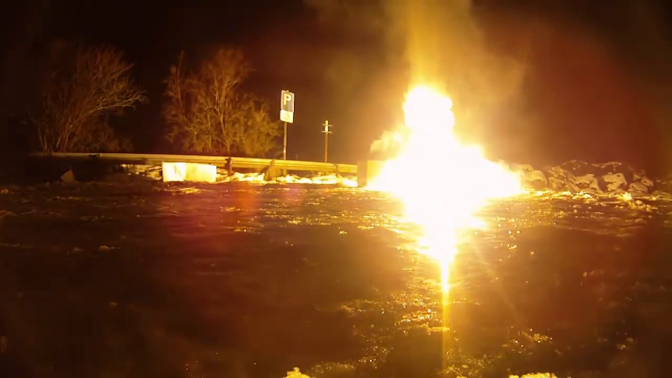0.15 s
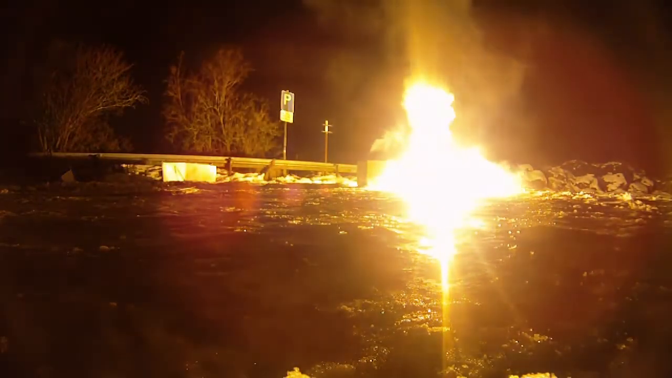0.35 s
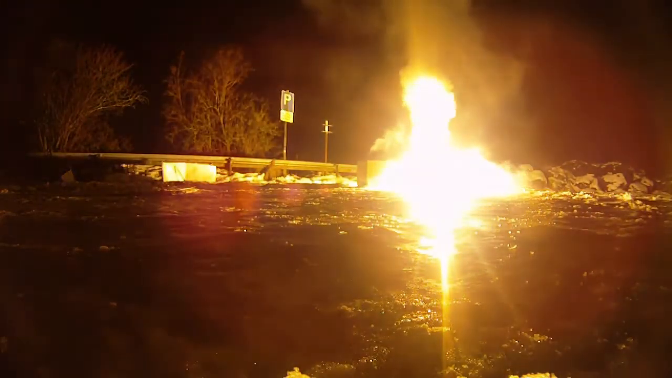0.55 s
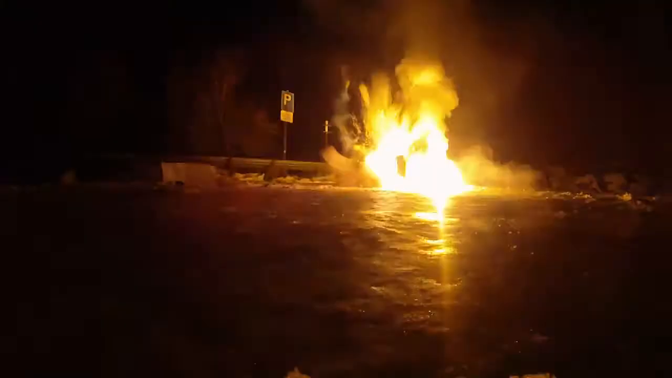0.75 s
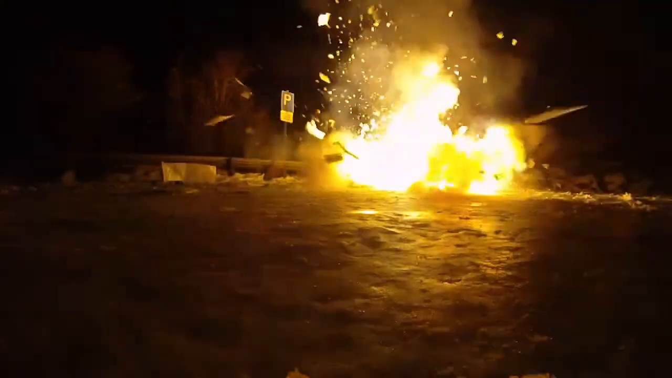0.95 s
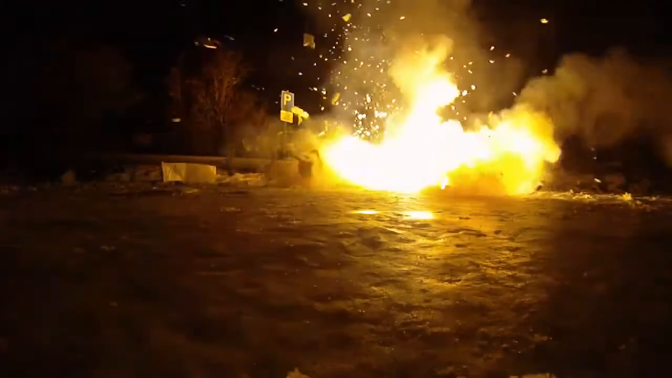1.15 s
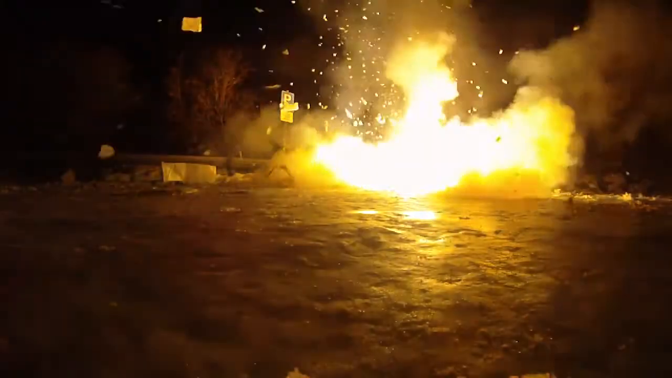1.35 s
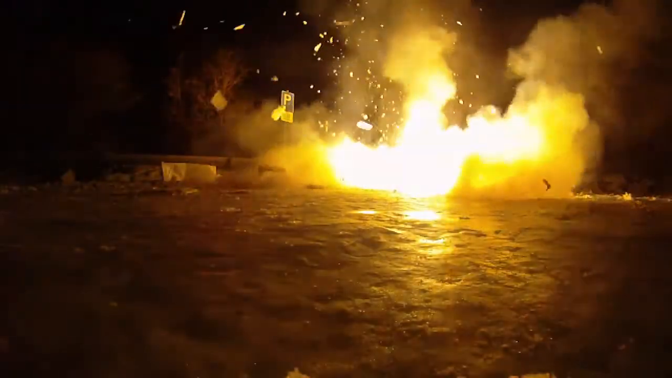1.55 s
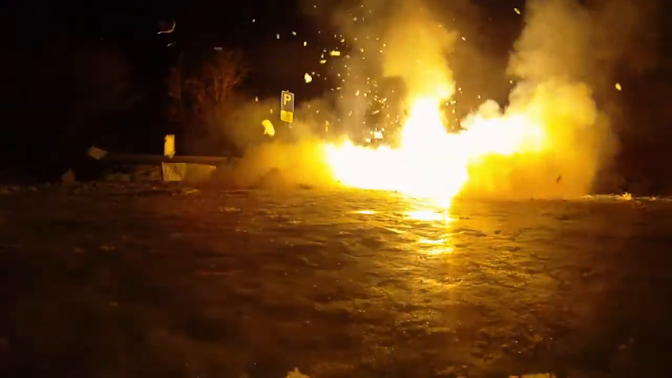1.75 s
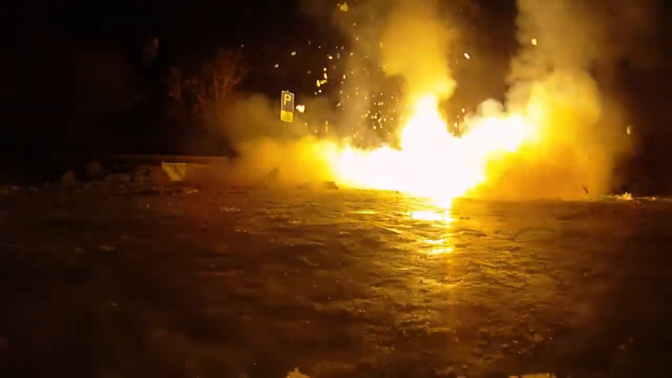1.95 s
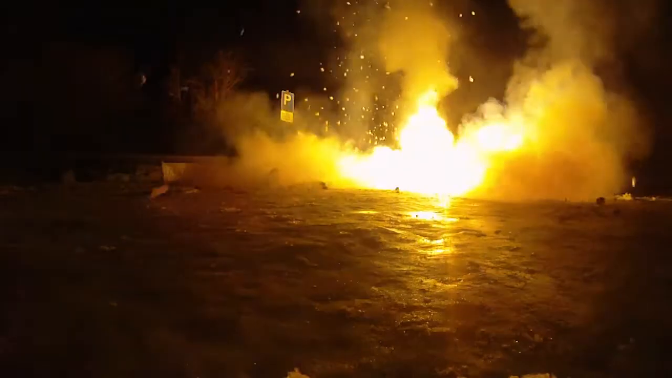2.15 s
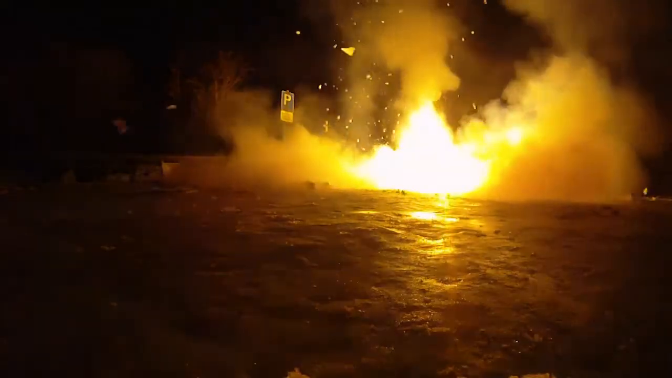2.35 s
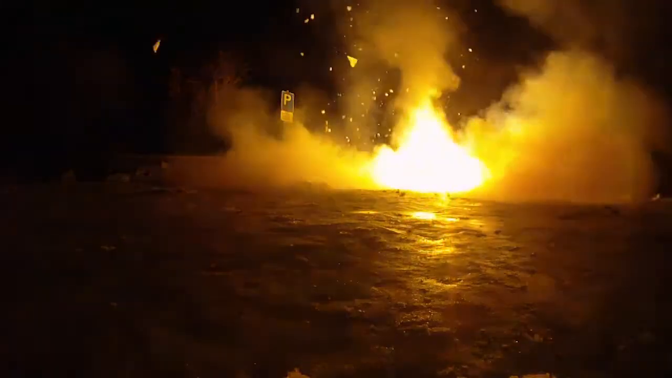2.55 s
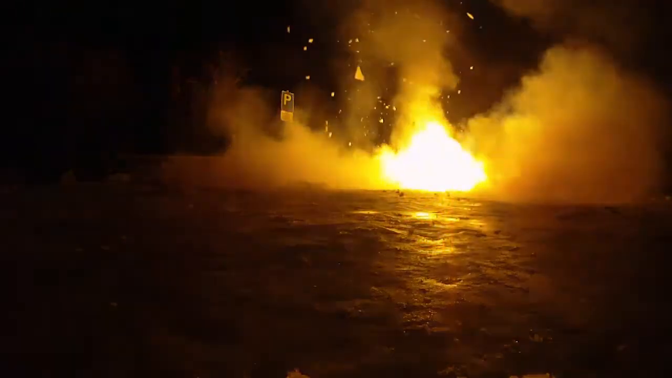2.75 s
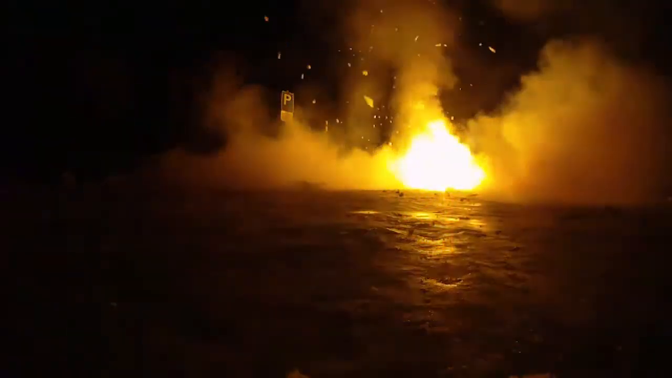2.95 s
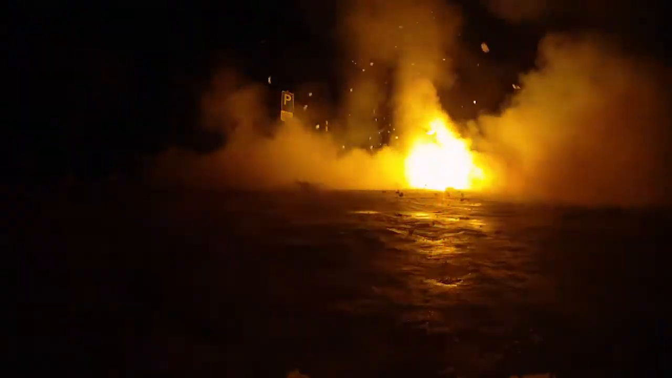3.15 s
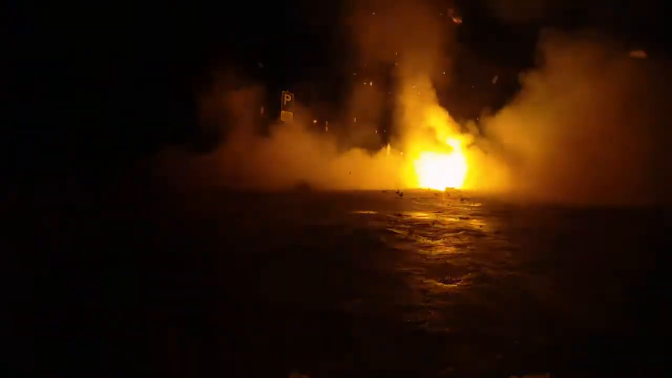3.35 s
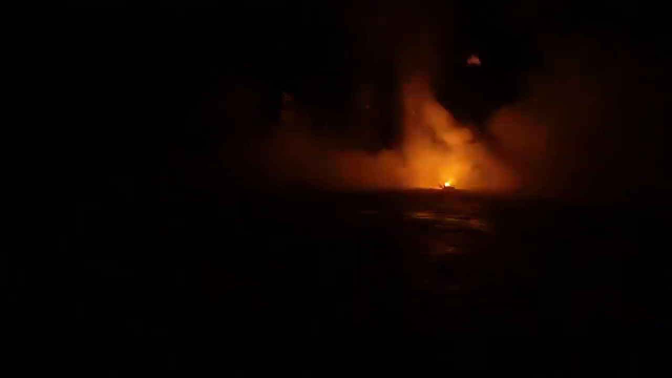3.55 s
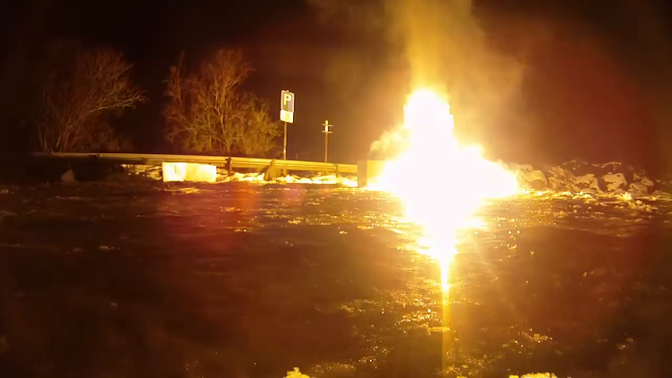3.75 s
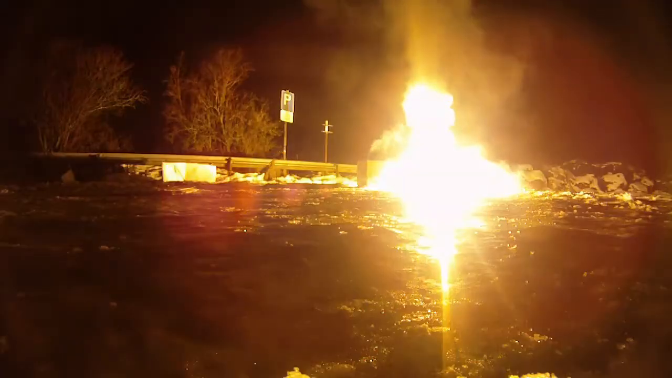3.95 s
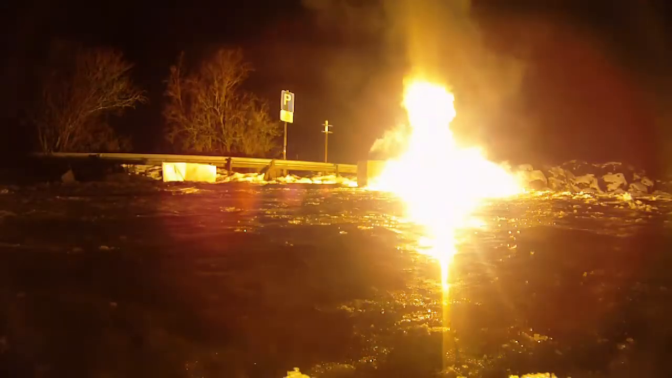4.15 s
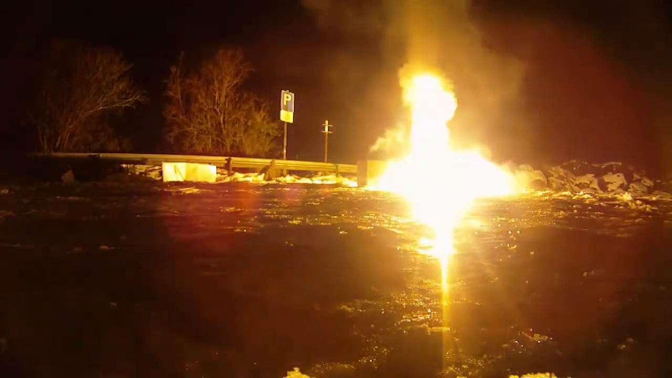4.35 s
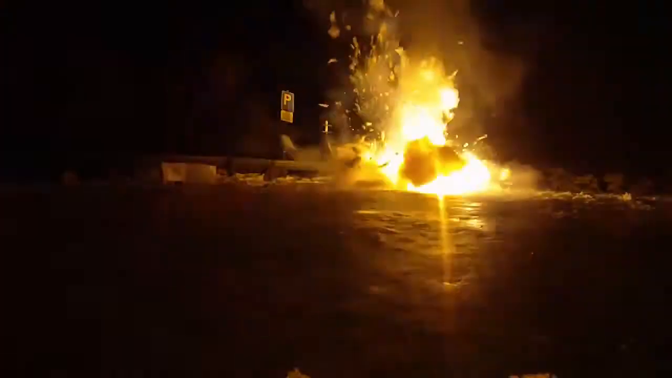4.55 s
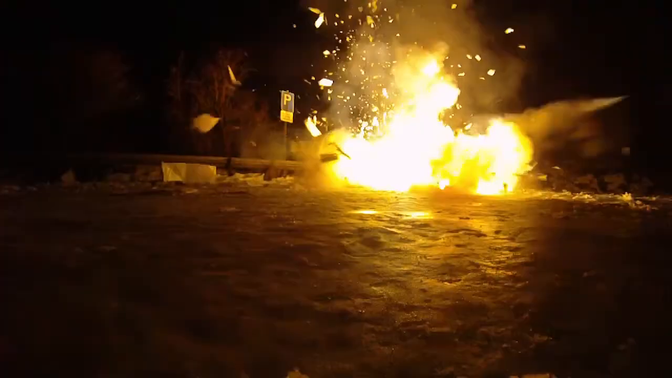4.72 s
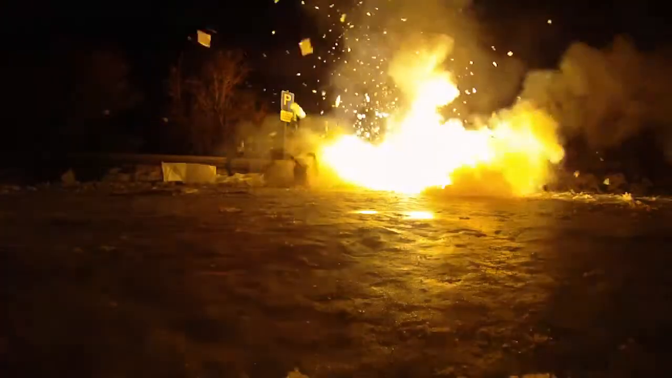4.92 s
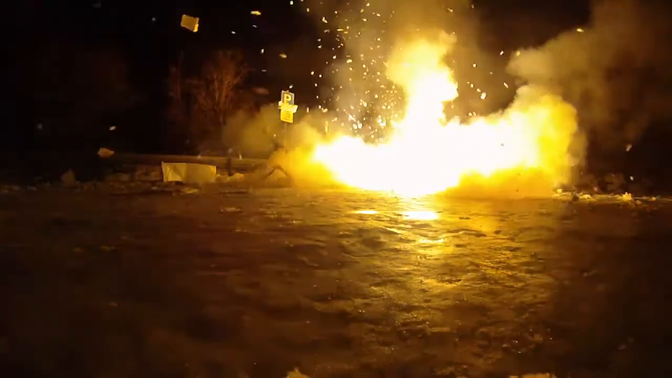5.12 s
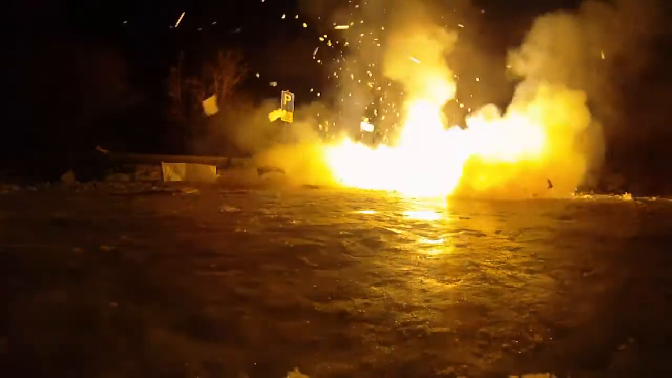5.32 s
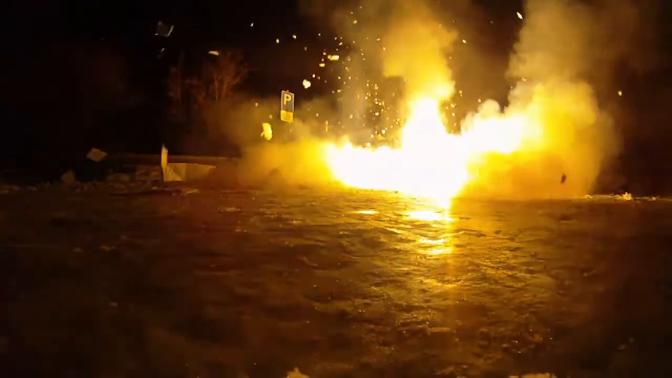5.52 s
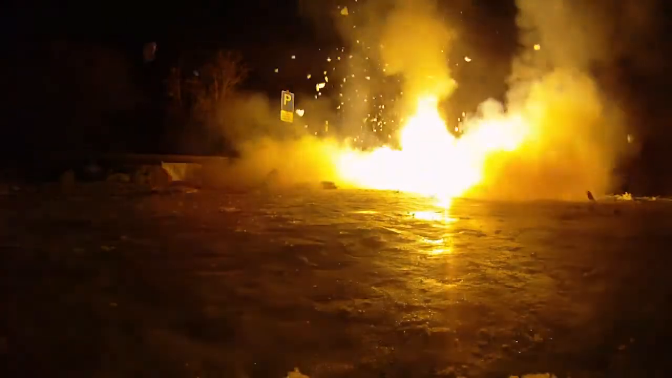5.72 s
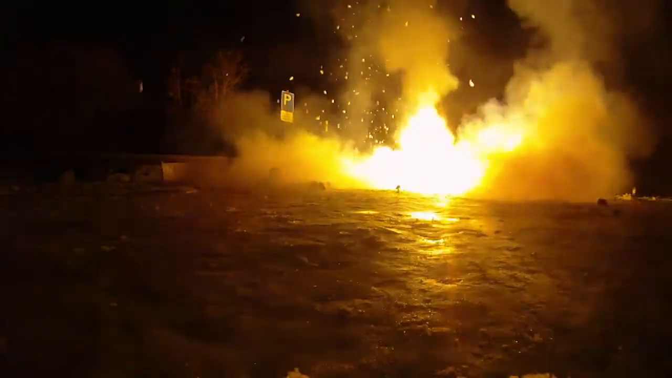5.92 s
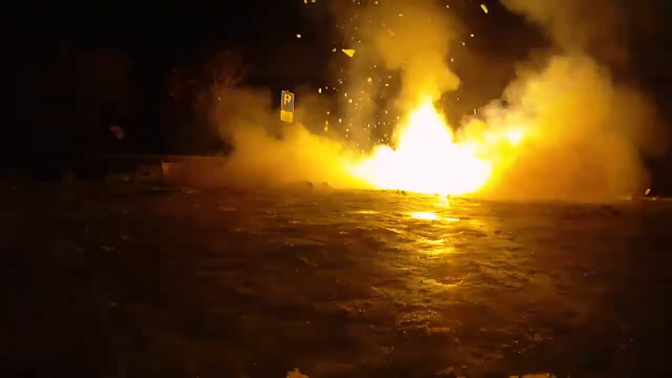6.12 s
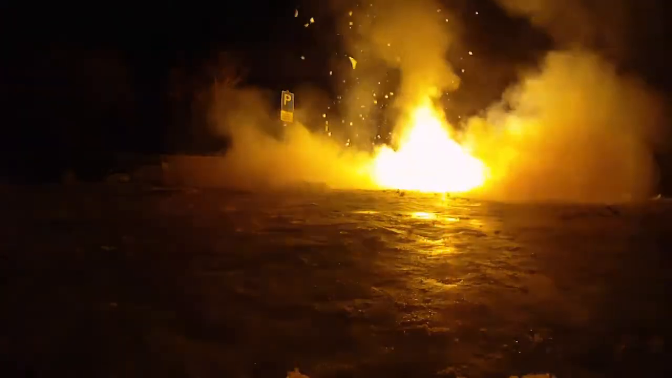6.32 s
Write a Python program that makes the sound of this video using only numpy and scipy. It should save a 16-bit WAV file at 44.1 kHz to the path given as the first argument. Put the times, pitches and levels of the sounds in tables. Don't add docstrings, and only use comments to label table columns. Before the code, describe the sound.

Near-silent night, a sharp distorted explosion with slapping echoes, a rolling low boom and ringing debris, abruptly cut and played again.

```python
import sys
import numpy as np
from scipy import signal
from scipy.fft import rfft, irfft
from scipy.io import wavfile
from scipy.ndimage import uniform_filter1d

SR = 44100
rng = np.random.default_rng(int(sys.argv[2]) if len(sys.argv) > 2 else 0)


def digitize_waveform(pressure):
    field = np.atleast_2d(pressure).T
    bounded = np.clip(field, -1, 1)
    quanta = np.round(bounded * 32767).astype(np.int16)
    wavfile.write(sys.argv[1], SR, quanta)


def linear_from_db(decibels):
    return 10 ** (np.asarray(decibels, float) / 20)


N = 281358
T = np.arange(N) / SR


def evened(x):
    return x / np.sqrt(np.mean(x ** 2) + 1e-20)


def add(mix, s, sound):
    part = mix[round(s * SR):][:len(sound)]
    part += sound[:len(part)]


def resonate(x, hz, width):
    turn = np.exp(2j * np.pi * np.cumsum(hz * np.ones(len(x))) / SR)
    r = np.exp(-np.pi * width / SR)
    return 2 * (turn * signal.lfilter([1 - r], [1, -r], x / turn)).real


def band(x, lo_hz, hi_hz):
    return signal.sosfilt(signal.butter(2, [lo_hz, hi_hz], "bandpass", fs=SR, output="sos"), x)


def colour(x, points):
    f, db = np.transpose(points)
    hz = abs(np.fft.fftfreq(4096, 1 / SR))
    gain_db = np.interp(np.log(hz + 1), np.log(f + 1), db)
    log_gain = np.log(linear_from_db(np.maximum(gain_db, -60)))
    taps = np.fft.ifft(np.exp(np.conj(signal.hilbert(log_gain)))).real[:2048]
    return signal.oaconvolve(x, taps)[:len(x)]


def burst(s, hold, rise, fall_db_per_s):
    t = T - s
    return np.clip(t / rise, 0, 1) ** 2 * linear_from_db(-2 * fall_db_per_s * np.maximum(t - hold, 0))


def housing(x):
    # (frequency [Hz], level [dB per Hz])
    air = [(120, -39.5), (200, -9), (841, -17), (1330, -11), (1760, -30), (2090, -0.5), (2240, 0.5),
           (2860, -39.5), (3070, -4.5), (3910, -16.5), (5990, -29.5), (7790, -57), (13200, -120)]
    # (frequency [Hz], width [Hz], level [dB])
    case = [(1250, 310, -7), (1610, 150, -7.5), (2209, 160, 2.5), (3484, 160, -8), (3830, 72, -8.5),
            (5270, 88, -20.5)]
    return 0.7 * colour(x, air) + sum(linear_from_db(db) * resonate(x, hz, width) for hz, width, db in case)


def patter(per_s, spread_db, tail_ms):
    size = linear_from_db(spread_db * np.minimum(rng.exponential(1, N), 3))
    size = size * (rng.random(N) < per_s / SR)
    puff = np.exp(-np.arange(2000) / SR * 1000 / tail_ms)
    power = signal.oaconvolve(size ** 2, puff)[:N].clip(0) + 1.1
    return np.sqrt(power) * rng.standard_normal(N)


def night_air():
    # (frequency [Hz], level [dB per Hz])
    night = [(12, -35.5), (20, 3), (126, -4), (207, -6.5), (283, -9), (318, -8.5), (434, -11), (489, -16),
             (606, -12), (752, -16), (1330, -14.5), (1650, -20.5), (2100, -11), (2420, -16.5),
             (5990, -23.5), (7790, -54), (13200, -120)]
    return linear_from_db(-59.5) * evened(colour(rng.standard_normal(N), night))


def boom():
    # (time [s],
    # level [dB], hold [s])
    rolls = [(0.79, -57, .06), (0.862, -30.5, 0.031), (0.932, -34, 0.089), (1.019, -34, .14),
             (1.194, -45.5, 0.145), (1.353, -51, 0.097), (1.48, -49.5, 0.078), (1.682, -52.5, 0.061),
             (1.818, -58.5, 0.054), (2.042, -61, 0.082), (2.14, -52, 0.093), (2.263, -64, 0.11),
             (2.502, -64, 0.057), (2.65, -65.5, 0.035)]
    from_hz, to_hz, sinks_at_s, sink_s = 140, 48, 0.97, .22
    rise_s, fall_db_per_s = .012, 450
    hz = to_hz + (from_hz - to_hz) * np.exp(-np.maximum(T - sinks_at_s, 0) / sink_s)
    roll = evened(resonate(resonate(rng.standard_normal(N), hz, 50), hz, 65))
    rumble = evened(band(rng.standard_normal(N), 30, 75))
    body = evened(band(rng.standard_normal(N), 55, 200))
    roll = roll + 0.29 * rumble + 1.3 * (hz / from_hz) ** 1.83 * body
    roll = roll / np.sqrt(uniform_filter1d(roll ** 2, 3000) + 1e-12)
    power = sum(linear_from_db(2 * db) * burst(s, hold, rise_s, fall_db_per_s) for s, db, hold in rolls)
    return np.sqrt(power) * roll


def rain():
    # (time [s], ring [dB], hold [s], heavy pieces re ring [dB], grit re ring [dB])
    showers = [(0.844, -42, 0.045, -5, -1), (0.937, -35.5, 0.038, -5.5, -2), (1.018, -39, 0.11, -3, -5),
               (1.141, -41, 0.032, -2.5, 2), (1.24, -50.5, 0.13, -5, -1.5), (1.458, -41.5, 0.08, -4.5, -4),
               (1.554, -44, 0.1, -1, -2), (1.804, -50, 0.11, -1.5, 2), (1.971, -47, 0.075, -4.5, -4.5),
               (2.101, -50.5, .12, -8, -5), (2.393, -57, 0.09, -6.5, -9), (2.52, -54, .13, -12.5, -10),
               (2.694, -57, 0.027, -16, -4.5), (2.828, -51, 0.047, -8, -6.5),
               (2.917, -48.5, 0.027, -5, -8.5), (3.002, -49, 0.092, -8.5, -4.5),
               (3.122, -48.5, 0.12, -7.5, -9.5), (3.278, -51, 0.1, -9, -6.5),
               (3.436, -53.5, 0.087, -9, -17), (3.57, -40, 0.083, -7.5, -4)]
    rise_s, fall_db_per_s = 0.0062, 167.5
    drizzle_s, drizzle_db, drizzle_fall_db_per_s = 1, np.array([-51.5, -52, -50]), (2.5, 7, 4)
    sand_fall_db_per_s = 2.5

    level_db = drizzle_db[:, None] - np.outer(drizzle_fall_db_per_s, T - drizzle_s)
    power = linear_from_db(2 * level_db) * (T > drizzle_s)
    for s, db, hold, heavy_db, grit_db in showers:
        layers_db = db + np.array([[0], [heavy_db], [grit_db]])
        power = power + linear_from_db(2 * layers_db) * burst(s, hold, rise_s, fall_db_per_s)
    clumps = evened(uniform_filter1d(uniform_filter1d(rng.standard_normal((3, N)), 450), 600))

    hits = housing(patter(220, 1.8, 3.0))
    grit = housing(patter(450, 3.6, 1.6))
    sand = evened(band(rng.standard_normal(N), 4200, 5700))
    sand = sand * grit.std() * linear_from_db(-3 - sand_fall_db_per_s * (T - drizzle_s))
    ring = band(band(hits, 1893, 2750), 1850, 2900)
    heavy = band(hits + 0.92 * grit, 370, 1550)
    ticks = band(grit + .4 * hits + .25 * sand, 2900, 7000)
    parts = ring, heavy, ticks
    return sum(np.sqrt(g) * linear_from_db(1.45 * c) * evened(p) for p, g, c in zip(parts, power, clumps))


def shock():
    # (time [s], pressure step [full scale], rise [ms], sag [ms], crackle [dB], crackle decay [ms])
    fronts = [
        (.84847, -1.04, .09, 4.4, -34, .6),
        (.85100, 2.72, .55, 2.9, -30, .4),
        (.85458, -.85, .09, 9.0, -17, 2.0),
        (.85500, -.62, .5, 9.0, -19, 2.5),
    ]
    flutter_s, flutter_hz, flutter_size, flutter_ms = .85126, 5750, .85, .14
    dive_s, dive_ms = .8558, 1.25
    out = np.zeros(N)
    t = np.arange(800) / SR * 1000
    for s, step, rise_ms, sag_ms, crackle_db, crackle_ms in fronts:
        add(out, s, step * np.exp(-t / sag_ms) * (1 - np.exp(-(t / rise_ms) ** 2)))
        crackle = evened(resonate(rng.standard_normal(800), 2900, 1400))
        add(out, s, linear_from_db(crackle_db) * np.exp(-t / crackle_ms) * crackle)
    since = T - flutter_s
    swell = np.exp(-(since * 1000 / flutter_ms) ** 2 / 2)
    out -= flutter_size * np.cos(2 * np.pi * flutter_hz * since) * swell
    return out * np.exp(-np.maximum(T - dive_s, 0) * 1000 / dive_ms)


def slaps():
    # (time [s], push [dB], push frequency [Hz], crack [dB], crack t60 [s])
    slap_echoes = [
        (0.8713, -14.5, 172, -26, 0.074),
        (0.9412, -11, 145, -14.5, 0.037),
        (.9480, -23.5, 120, -24, 0.058),
        (1.1, -17.5, 130, -33, 0.037),
        (1.1531, -25.5, 127, -37, 0.054),
    ]
    out, t = np.zeros(N), np.arange(SR // 5) / SR
    for s, push_db, hz, crack_db, t60 in slap_echoes:
        swing = np.cos(2 * np.pi * hz * t) * np.exp(-t * hz * 1.3)
        add(out, s, -linear_from_db(push_db) * swing * (1 - np.exp(-t / 0.00083)))
        noise = rng.standard_normal(len(t))
        crack = housing(noise) + 0.77 * band(noise, 1600, 3800) + .9 * band(noise, 700, 1050)
        add(out, s - 4e-4, linear_from_db(crack_db - 60 * t / t60) * evened(band(crack, 199, 5200)))
    return out


def jolt():
    # (frequency [Hz], level [dB], t60 [s])
    body_modes = [(560, -21.5, 0.022), (835, -18.5, 0.04), (986, -17, 0.037), (2090, -18, 0.083),
                  (2150, -29.5, 0.035), (2475, -19.5, 0.038), (3460, -14, 0.029), (4395, -23.5, .02)]
    jolt_s, dip_db, dip_ms = .9412, -3, 0.071
    rebound_s, rebound_db = .0029, -15
    out, t = np.zeros(N), np.arange(4000) / SR
    dip = -linear_from_db(dip_db) * np.exp(-(t * 1000 / dip_ms - 2) ** 2 / 2)
    add(out, jolt_s + rebound_s, linear_from_db(rebound_db) * dip)
    shake = sum(linear_from_db(db - 60 * t / t60) * np.sin(2 * np.pi * hz * t) for hz, db, t60 in body_modes)
    add(out, jolt_s, dip + shake)
    return out


def landings():
    # (time [s], peak [dB], thud [dB], tick [dB])
    clunks = [(.9948, -21.5, -3, -13), (1.0304, -30, 0, -13), (1.0978, -19.5, -8, -13),
              (1.1805, -21, -12, -5.5), (1.4508, -22.5, -11, -17), (1.4622, -18.5, -12, -15),
              (1.4805, -19, -8, -11), (1.56, -28.5, -4, -0.5), (1.6333, -25, -13, -23),
              (1.8658, -31, -14, -4), (1.8876, -34, -17, -9.5), (1.9855, -23.5, -16.5, -20),
              (2.012, -30, -22, -23), (2.1667, -25.5, -11, -8.5), (2.2988, -26, -17.5, -16.5),
              (2.3951, -36, -16, -11), (2.9275, -24, -23, -19), (2.9439, -27, -24, -20),
              (3.1975, -25.5, -12, -27), (3.3519, -30, -16, -17.5), (3.3719, -27, -29, -21),
              (3.4463, -22.5, -34, -23), (3.59, -31, -14, -14), (3.6074, -31, -6, -18)]
    # (time [s], peak [dB])
    chips = [(1.0696, -32), (1.333, -36), (1.353, -35), (1.419, -33), (1.6179, -28), (1.6538, -31),
             (1.7471, -37), (1.9632, -35.5), (2.1182, -37), (2.1462, -36), (2.207, -35), (2.2789, -31.5),
             (2.4495, -40), (2.4799, -36.5), (2.5418, -41), (2.5732, -33), (2.7099, -30), (2.7333, -32.5),
             (2.8251, -39), (2.8511, -34), (3.0002, -36), (3.0387, -35), (3.0524, -33.5), (3.0677, -30.5),
             (3.1314, -30), (3.2701, -34), (3.314, -49), (3.4936, -33), (3.5506, -41)]
    # (time [s], peak [dB], thud [dB], tick [dB])
    snaps = [
        (1.1541, -19, -14, -5),
        (1.2457, -14.5, -19, -17.5),
        (1.2996, -26.5, -22, -8),
        (1.777, -36.5, -13, 0),
        (1.797, -22.5, -9.5, -8.5),
        (2.3157, -20, -30, -9.5),
        (2.7832, -31.5, -21, -5.5),
        (3.1945, -33, -15, -7),
        (3.5759, -23, -28, -14),
    ]
    tick_hz, tick_hz_per_db, tick_spread_hz = 3794, 24, 290
    edge_ms, click_db = 0.88, -5
    pieces = [(*row, .018, 0.052, True) for row in snaps]
    pieces += [(*row, 0.061, 0.65, False) for row in clunks]
    pieces += [(*row, -22, -12.5, 0.033, 0.65, False) for row in chips]

    out, t = np.zeros(N), np.arange(3000) / SR
    for s, db, thud_db, tick_db, t60, rise_ms, hard_edge in pieces:
        noise = rng.standard_normal(3002)
        hz = tick_hz + tick_hz_per_db * tick_db + tick_spread_hz * np.sin(np.pi * noise[1])
        blow = noise[2:] * linear_from_db(-60 * t / t60) * (1 - np.exp(-t * 1000 / rise_ms))
        knock = resonate(resonate(blow, 2230 + 70 * noise[0], 240), 2217, 370)
        tick = evened(resonate(resonate(blow, hz, 370), hz, 1100)) + 0.5 * evened(band(blow, 2800, 6400))
        thud = band(band(blow, 560, 1820), 340, 1900)
        knock, tick, thud = (v / abs(v).max() for v in (knock, tick, thud))
        add(out, s - 2e-4, linear_from_db(db - 7.0) * (knock + linear_from_db(tick_db + 9.5) * tick + linear_from_db(thud_db + 2) * thud))
        if hard_edge:
            click = band(noise[2:] * np.exp(-t * 1000 / edge_ms), 1100, 4900)
            add(out, s - 2e-4, linear_from_db(db + click_db + 0.55 * tick_db) * click / abs(click).max())
    return out


def plate():
    # (frequency [Hz], drift [Hz/s], level [dB], t60 [s])
    plate_modes = [(1217, 0, -41, .45), (3408, 0, -40, 1.3), (3476, -300, -37, .9), (3978, 0, -52, .4)]
    out, t = np.zeros(N), np.arange(SR // 4) / SR
    ring = 0
    for hz, drift, db, t60 in plate_modes:
        ring = ring + linear_from_db(db - 60 * t / t60) * np.sin(2 * np.pi * (hz + drift * t / 2) * t)
    fade = signal.windows.tukey(2 * len(t), .45)[len(t):]
    add(out, 1.163, ring * (1 - np.exp(-t / 0.0037)) * fade)
    return out


def skids():
    # (time [s], length [s], level [dB], pitch [Hz], width [Hz])
    ice_skids = [(1.4, 0.015, -50, 5300, 260), (1.24, 0.033, -47, 1400, 68),
                 (1.449, 0.0789, -35, 2550, 330), (1.455, 0.071, -49, 1120, 1500),
                 (1.627, 0.049, -51, 230, 90), (1.83, 0.034, -47, 1300, 500),
                 (2.291, 0.022, -46.5, 2270, 300), (3.264, 0.051, -67.5, 4300, 140),
                 (3.573, 0.055, -46.5, 230, 250), (3.572, .12, -57.5, 127, 90),
                 (3.15, 0.061, -60.5, 80, 47), (1.86, 0.0474, -55, 231, 120),
                 (3.596, 0.081, -48.5, 985, 130), (3.609, 0.052, -43.5, 3840, 300),
                 (3.629, 0.087, -51.5, 490, 410)]
    out = np.zeros(N)
    for s, length, db, hz, width in ice_skids:
        chatter = patter(400, 1.0, 1.8)[:round(length * SR)]
        scrape = evened(resonate(resonate(chatter, hz, width), hz, 2 * width))
        add(out, s, linear_from_db(db) * scrape * signal.windows.tukey(len(chatter), .15))
    return out


def scene():
    cut_s = 3.702
    before_cut = np.exp(-np.maximum(T - cut_s, 0) / 0.0056)
    night = night_air()
    airborne = rain() + slaps() + landings() + skids()
    airborne = airborne - 0.45 * resonate(airborne, 1802, 260)
    blast = boom() + shock() + jolt() + airborne + plate()
    return (blast * before_cut + night)[None]


def band_limit(x):
    return signal.sosfilt(signal.butter(12, 16320, fs=SR, output="sos"), x)


def record(dry):
    # (frequency [Hz], level [dB])
    worn_top = [(20, 0.5), (10300, -0.5), (11300, 1), (12000, -4), (12900, -0.5), (14000, -2),
                (15100, -1.5), (15450, -34.5), (16500, -42.5)]
    replay_s, hiss_db = 164752 / 44100, -88.5
    overloaded = signal.resample_poly(dry[0], 40, 147).clip(-1, 1)
    held = signal.resample_poly(np.repeat(overloaded, 4), 147, 160)[:N]
    held = np.pad(held, (0, N - len(held))) + linear_from_db(hiss_db) * rng.standard_normal(N)
    hz, db = np.transpose(worn_top)
    gain = linear_from_db(np.interp(np.fft.rfftfreq(N, 1 / SR), hz, db))
    held = irfft(rfft(held) * gain, N)
    replay = np.roll(held, round(replay_s * SR))
    played = np.where(T < replay_s, held, replay).clip(-1, 1)
    return band_limit(played[None])


dry = scene()
out = record(dry)
digitize_waveform(out)
```